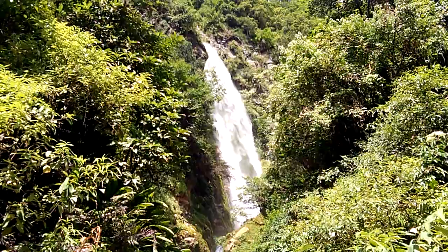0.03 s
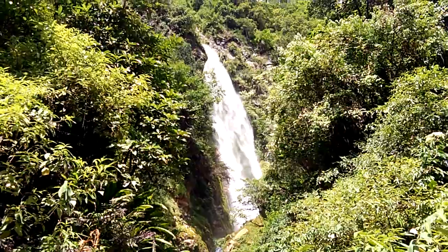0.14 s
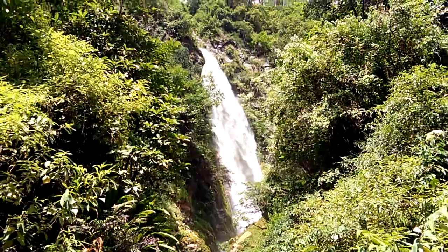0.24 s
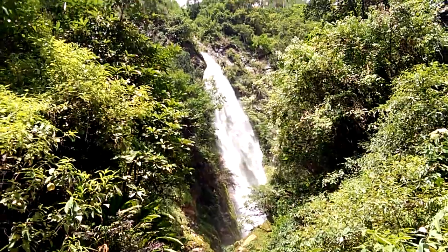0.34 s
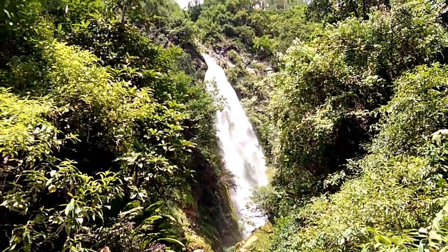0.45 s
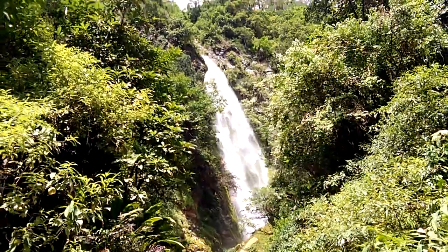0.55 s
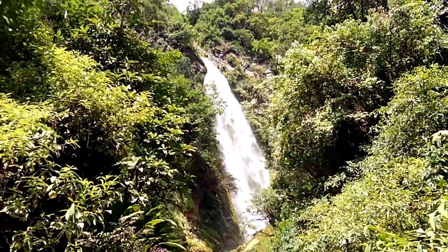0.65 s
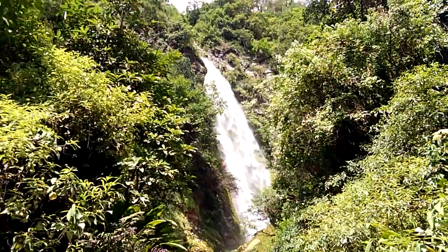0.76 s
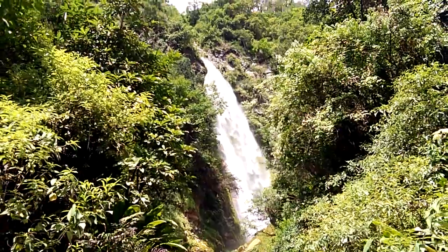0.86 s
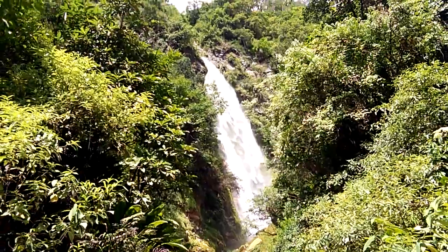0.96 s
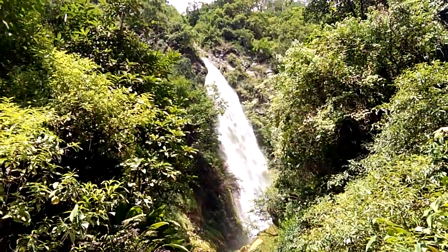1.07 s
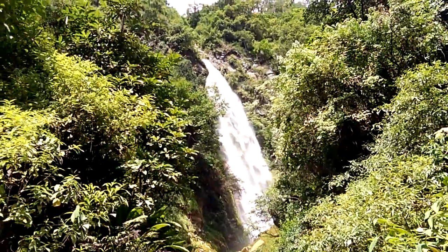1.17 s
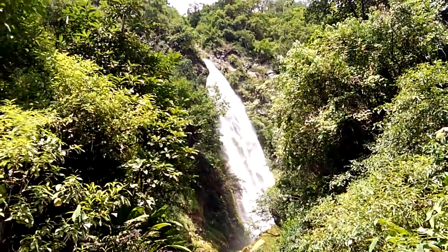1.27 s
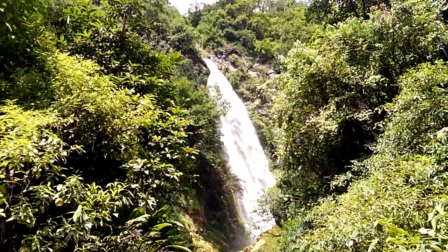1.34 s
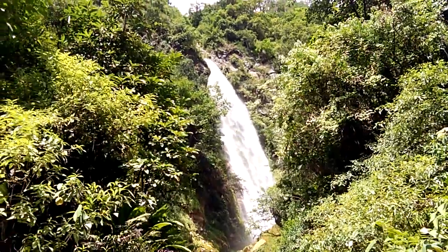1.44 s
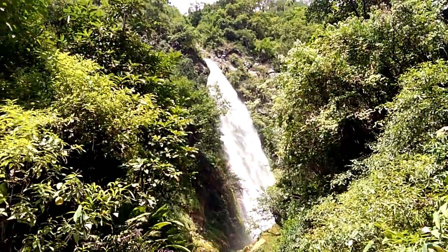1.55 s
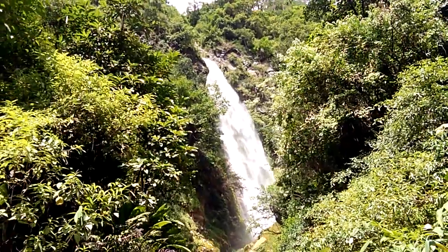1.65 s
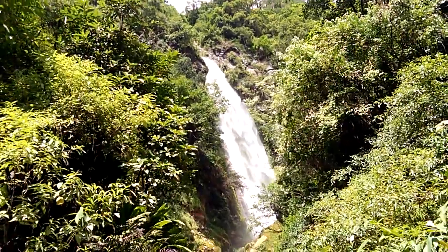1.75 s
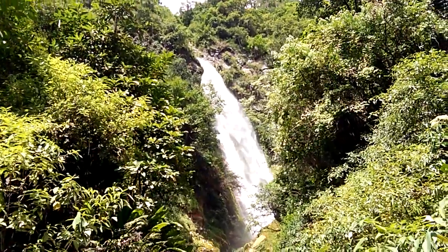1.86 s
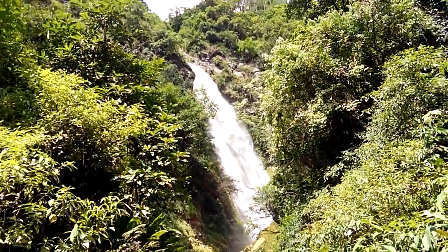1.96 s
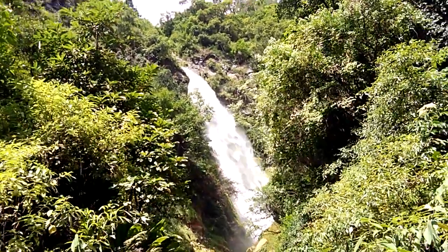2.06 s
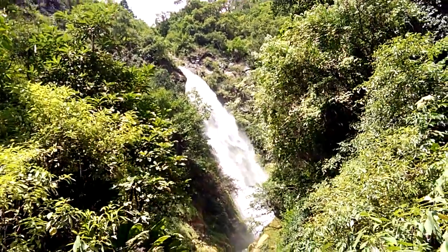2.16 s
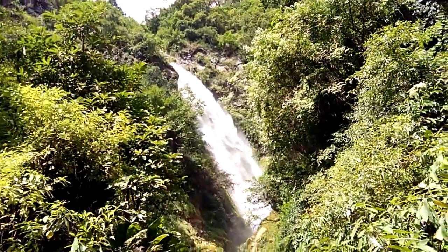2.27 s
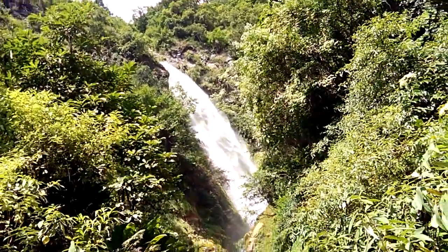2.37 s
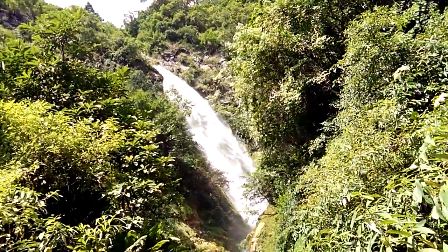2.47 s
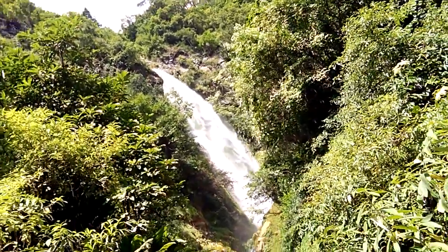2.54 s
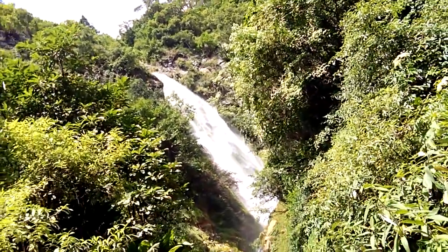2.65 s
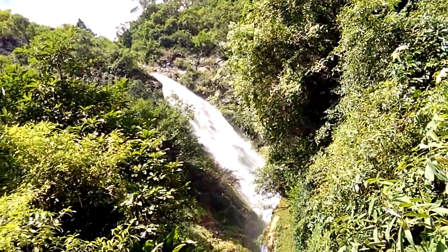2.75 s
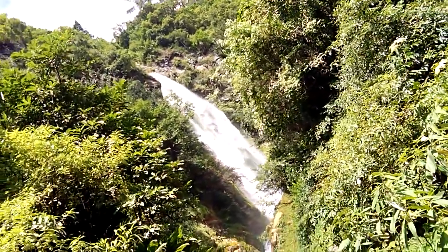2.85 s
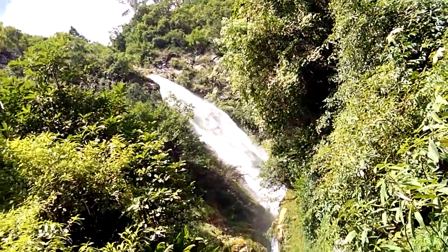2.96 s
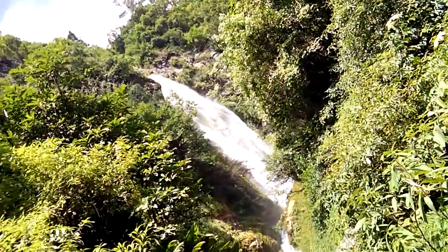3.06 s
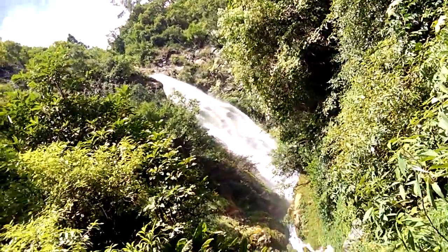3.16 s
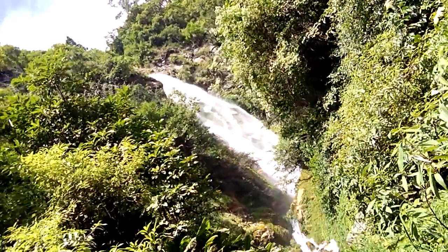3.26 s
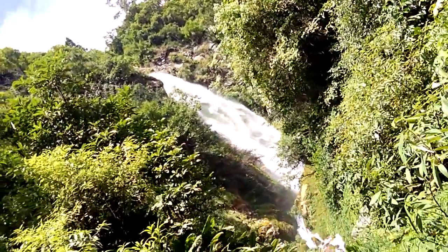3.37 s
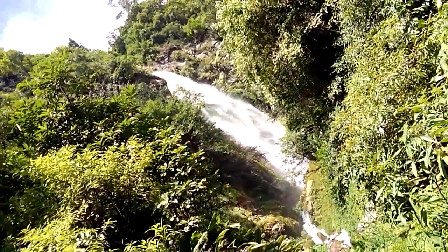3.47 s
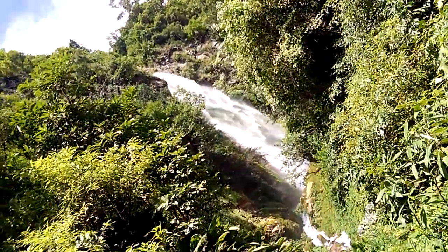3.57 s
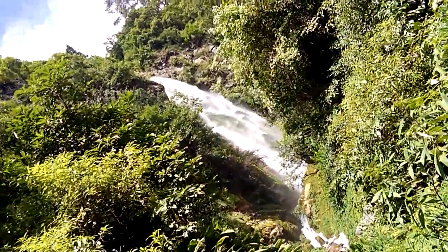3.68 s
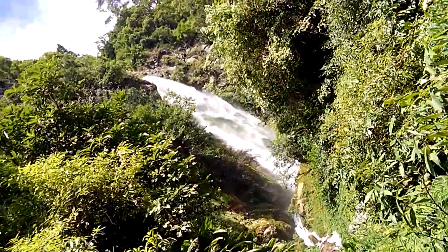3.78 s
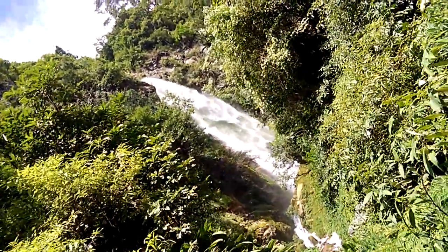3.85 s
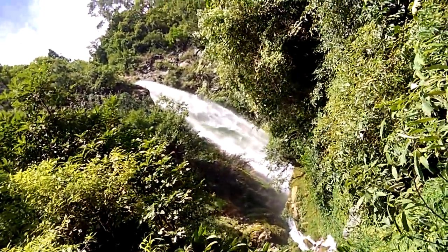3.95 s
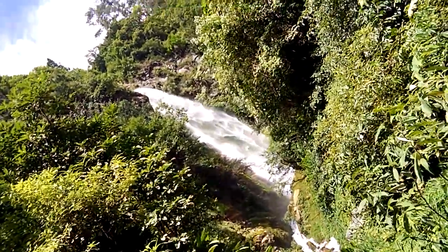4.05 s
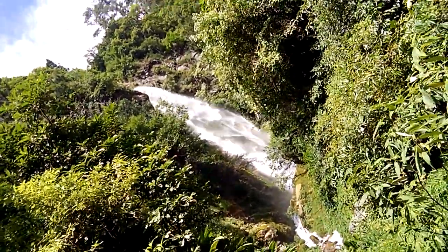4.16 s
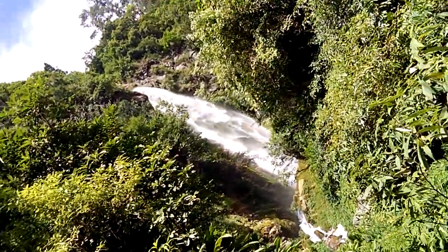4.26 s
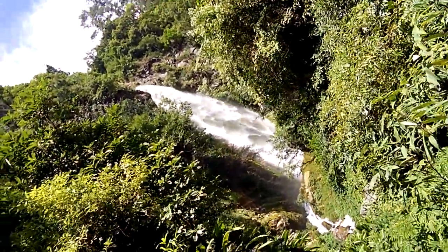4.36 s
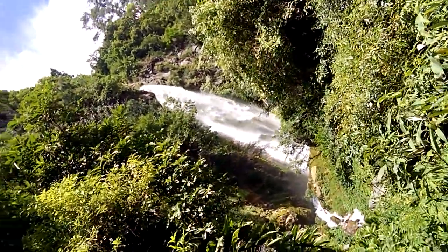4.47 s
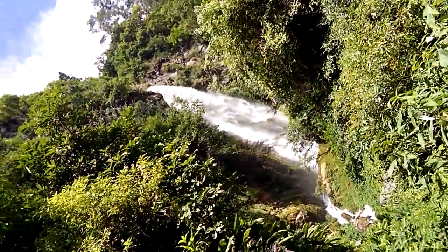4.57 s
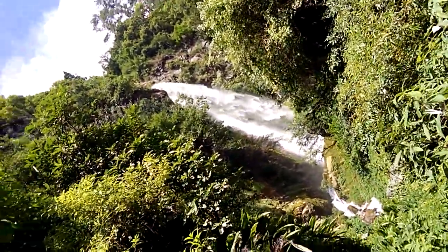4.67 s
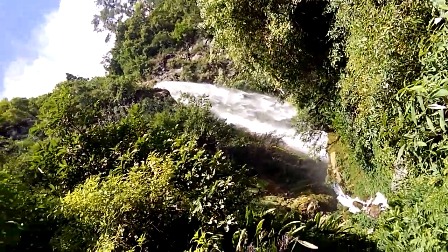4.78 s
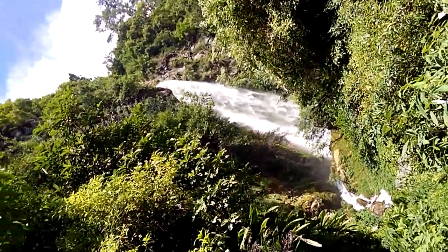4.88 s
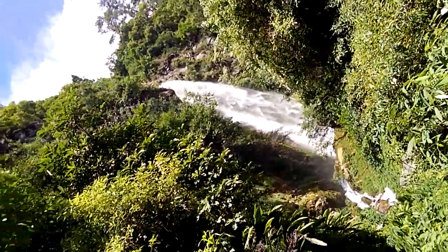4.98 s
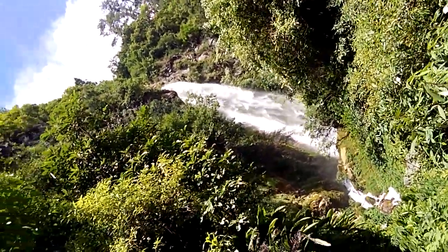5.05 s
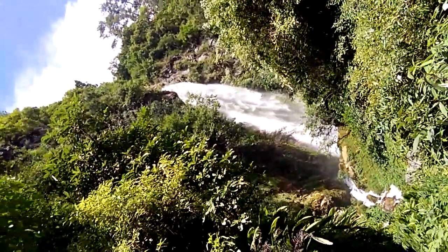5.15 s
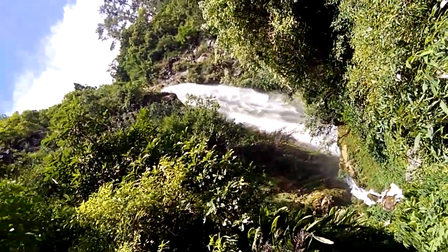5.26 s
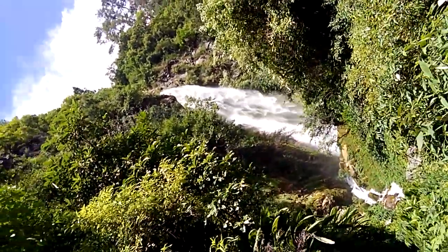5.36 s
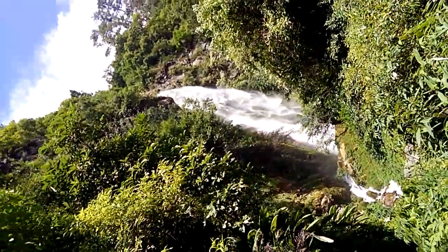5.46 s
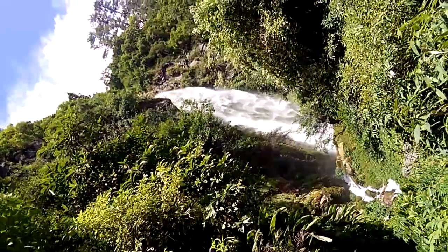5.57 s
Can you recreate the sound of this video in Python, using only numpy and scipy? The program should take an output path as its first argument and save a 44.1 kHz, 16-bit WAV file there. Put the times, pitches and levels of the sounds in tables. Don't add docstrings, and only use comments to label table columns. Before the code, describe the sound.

A tall waterfall roars steadily outdoors while a small frog rasps quickly, then the sound turns hollow and wind thumps the microphone.

```python
import sys
import numpy as np
from scipy import signal
from scipy.io import wavfile
from scipy.ndimage import uniform_filter1d

SR = 44100
rng = np.random.default_rng(int(sys.argv[2]) if len(sys.argv) > 2 else 0)


def unload_wav(signal):
    wavfile.write(
        sys.argv[1],
        SR,
        np.round(np.clip(np.atleast_2d(signal).T, -1, 1) * 32767).astype(np.int16),
    )


def amplitude_ratio(level_db):
    exponent = np.asarray(level_db, float) / 20
    return 10 ** exponent


N = 247842


def evened(x):
    return x / np.sqrt(np.mean(x ** 2) + 1e-20)


def read(curve, hz):
    f, db = np.transpose(curve)
    return np.interp(np.log(hz + 1), np.log(f + 1), db)


def follow(moves, t):
    return np.interp(t, *np.transpose(moves))


def add(mix, s, sound):
    part = mix[round(s * SR):][:len(sound)]
    part += sound[:len(part)]


def humps(modes, hz):
    return sum(db * np.exp(-(2 * (hz - f) / width) ** 2) for f, width, db in modes)


def shaped(x, db_of, size):
    settings = dict(nperseg=size, noverlap=size * 3 // 4)
    hz, t, z = signal.stft(x, SR, **settings)
    return signal.istft(z * amplitude_ratio(db_of(hz[:, None], t)), SR, **settings)[1][:N]


def smoothed(x, size, axis=0):
    once = uniform_filter1d(x, size=size, axis=axis)
    return uniform_filter1d(once, size=size, axis=axis)


def bubbles(per_s, spread_db, cycles, count):
    out = np.zeros(N)
    for hz in np.geomspace(200, 14000, count):
        turns = np.arange(0, 3 * cycles, hz / SR)
        envelope = turns * np.exp(-4 * turns / cycles)
        ring = np.sin(2 * np.pi * turns * (1 + 0.019 * turns)) * envelope
        strength = amplitude_ratio(spread_db * np.minimum(rng.exponential(1, N), 4))
        struck = rng.random(N) < per_s * hz / 1000 / SR
        out += signal.oaconvolve(strength * struck, ring * np.sqrt(hz))[:N]
    return evened(out)


# f/Hz, level/(dB per Hz)
ROAR_SPECTRUM = [(15, -27), (25, -9), (132, 0), (168, -2), (214, -1), (347, -2.5), (386, -2), (519, -0.5),
                 (1330, -4.5), (1830, -4.5), (3680, -15.5), (4810, -18), (7800, -30), (11700, -37.5),
                 (15200, -39)]


def waterfall():
    roar_db = -30.5
    near = 0.3

    def field(hz, t):
        patches = rng.standard_normal((len(t), len(hz))).T
        patches = uniform_filter1d(uniform_filter1d(patches, size=16, axis=0), size=16, axis=1)
        flicker = evened(smoothed(rng.standard_normal(len(t)), 9))
        patches_db = 0.71 * evened(patches) / (1 + hz / 6000)
        return read(ROAR_SPECTRUM, hz) + patches_db + 0.41 * flicker

    blur = rng.standard_normal(N)
    bursts = bubbles(per_s=250, spread_db=1.95, cycles=4.96, count=30)
    water = np.sqrt(1 - near) * blur + np.sqrt(near) * bursts
    return amplitude_ratio(roar_db) * evened(shaped(water, field, size=1024))


# f/Hz, level/(dB per Hz)
WIND_SPECTRUM = [(10, -20), (22, -11), (32, 0.5), (43, -5.5), (75, -8), (110, -11.5), (180, -22),
                 (400, -57)]
# t/s, length/s, level/dB
GUSTS = [(.78, .07, -41), (1.4, 0.044, -45), (1.6, 0.044, -42), (1.772, .05, -42), (2.14, .04, -43),
         (2.86, 0.045, -42), (3.6, .15, -41), (3.8, .12, -46), (4.062, 0.112, -38.5), (4.26, .05, -41),
         (4.36, .12, -39), (4.597, 0.031, -39.5), (4.68, 0.1, -37), (4.83, 0.037, -37.5),
         (5.032, 0.26, -31.5), (5.34, .09, -34.5), (5.48, .12, -29.5)]
# t/s, peak level/dB, f/Hz
EDDIES = [(3.63, -31, 59), (3.73, -30, 48), (4.38, -21, 56), (4.393, -28, 135), (4.4, -26, 36),
          (4.42, -27, 72), (4.742, -25, 62), (5.046, -27, 52), (5.128, -25, 55), (5.15, -24, 32),
          (5.2, -25, 32), (5.245, -27, 62), (5.295, -28, 36), (5.463, -24, 34), (5.524, -22, 27),
          (5.563, -26, 40)]


def wind():
    breeze_db, rise_s, fall_s = -47.5, 0.02, 0.03
    t = np.arange(N) / SR
    rumble = evened(shaped(rng.standard_normal(N), lambda hz, _: read(WIND_SPECTRUM, hz), size=4096))
    lumps = uniform_filter1d(rumble ** 2, size=3000)
    rumble = evened(rumble / (lumps + 0.05) ** 0.47)
    gusts = np.zeros(N)
    for s, length, db in GUSTS:
        corners = [s - rise_s, s, s + length, s + length + fall_s]
        gusts += amplitude_ratio(db) * np.interp(t, corners, [0, 1, 1, 0])
    out = np.maximum(gusts, amplitude_ratio(breeze_db)) * rumble

    u = t[:round(0.055 * SR)]
    onset = np.sin(np.pi / 2 * np.minimum(u / 0.0057, 1)) ** 2
    ending = np.cos(np.pi / 2 * (u / u[-1]) ** 2)
    envelope = onset * np.exp(-u / 0.029) * ending
    for s, db, hz in EDDIES:
        at = round(s * SR)
        add(out, s, -out[at:at + len(u)] * signal.windows.tukey(len(u), 0.6))
        add(out, s, -amplitude_ratio(db) * np.sin(2 * np.pi * hz * u) * envelope)
    return out


CROAKS = [-42.5, -44, -46, -41, -41.5, -43, -47, -44, -47, -50, -44, -43, -40, -42.5, -41.5]
# f/Hz, width/Hz, level/dB
THROAT = [(2700, 110, 3), (3110, 130, 10.5), (3880, 220, 8.5)]


def frog():
    first_s, every_s = 0.735, 0.3437
    clicks = np.zeros(N)
    t = np.arange(round(0.06 * SR)) / SR
    swell = np.sin(np.pi * t / t[-1]) ** 0.39
    for i, db in enumerate(CROAKS):
        click_hz = 190 * (1 + 0.27 * rng.standard_normal())
        phase = np.cumsum(np.full(len(t), click_hz / SR))
        beats = np.diff(np.floor(phase), prepend=0)
        rasp = evened(beats) + 1.1 * rng.standard_normal(len(t))
        add(clicks, first_s + every_s * i - 0.008, amplitude_ratio(db) * evened(rasp) * swell)
    ring = np.zeros(len(t))
    for hz, width, db in THROAT:
        ring += amplitude_ratio(db) * np.exp(-np.pi * width * t) * np.sin(2 * np.pi * hz * t)
    voice = signal.oaconvolve(clicks, ring / np.linalg.norm(ring))[:N]
    return voice + 0.44 * np.roll(voice, round(0.021 * SR))


# f/Hz, width/Hz, level/dB
CASE = [(4790, 730, 3), (1850, 280, 0.5), (11350, 2200, 4.5)]
# f/Hz, width/Hz, level/dB
TURNED = [(2150, 1630, -4), (4780, 1000, -3), (8200, 1500, 2), (12200, 2600, 2.5), (13400, 1200, 2),
          (14900, 1800, 4)]
# f/Hz, width/Hz, level/dB
CUPPED = [(2306, 1390, 6.5), (3250, 740, 3), (6570, 1500, 3), (9500, 900, 2)]
# f/Hz, width/Hz, level/dB
SHADED = [(11300, 2100, -4), (12900, 2400, -2)]
# t/s, turn/(0-1)
TURN = [
    (.5, 0.3),
    (1.6, 0.32),
    (2.7, 0.7),
    (3.3, 1),
    (4.04, 1),
    (4.4, 0.4),
    (5.62, .45),
]
# t/s, cover/(0-1)
PALM = [
    (.5, 0.04),
    (2.8, .03),
    (3.3, 0.3),
    (3.76, 0.46),
    (4.04, 1),
    (4.08, 0.8),
    (4.2, 1),
    (4.5, 0.8),
    (5.62, 0.9),
]
# t/s, path/m
DETOUR = [
    (3.76, .0223),
    (4.04, .0184),
    (4.1, .0172),
    (4.4, .0144),
    (4.8, .0128),
]


def port(hz, t):
    slide_from_s, slide_to_s, slide_fade_s = 3.82, 4.3, 0.1
    shut_s, shutting_s = 4.05, 0.035
    sliding_db, rest_db, shut_db = 4, 1, 1
    sound_m_per_s = 343
    closed = np.clip((t - shut_s) / shutting_s, 0, 1)
    inside_s = np.minimum(t - slide_from_s, slide_to_s - t)
    sliding = np.clip(inside_s / slide_fade_s + 1, 0, 1)
    notch_hz = sound_m_per_s / (2 * follow(DETOUR, t))
    depth_db = rest_db + (sliding_db - rest_db) * sliding + shut_db * closed * (1 - sliding)
    notch = -depth_db * np.exp(-(2 * (hz - notch_hz) / (0.18 * notch_hz)) ** 2)
    case = humps(CASE, hz) + follow(TURN, t) * humps(TURNED, hz)
    hand = follow(PALM, t) * humps(CUPPED, hz) + closed * humps(SHADED, hz)
    return case + hand + notch


def scene():
    air = shaped(waterfall() + frog(), port, size=1024)
    return (air + wind())[None]


def top_cut(x):
    return signal.sosfilt(signal.butter(12, 15510, fs=SR, output="sos"), x)


def record(dry):
    start_s = 0.5836
    running = np.arange(N) >= start_s * SR
    return top_cut(dry * running)


dry = scene()
out = record(dry)
unload_wav(out)
```